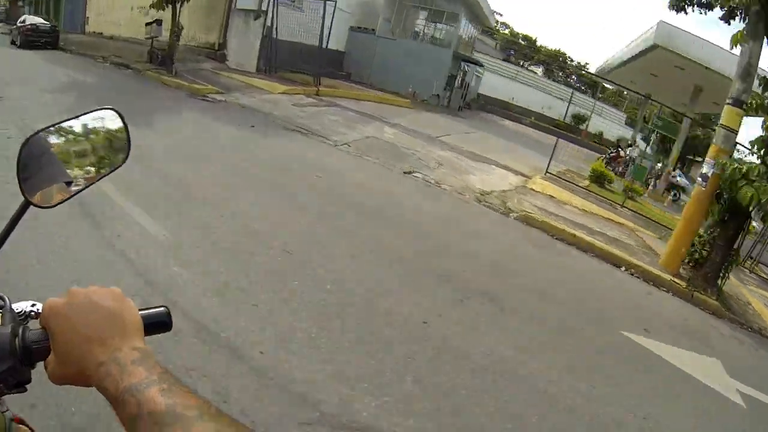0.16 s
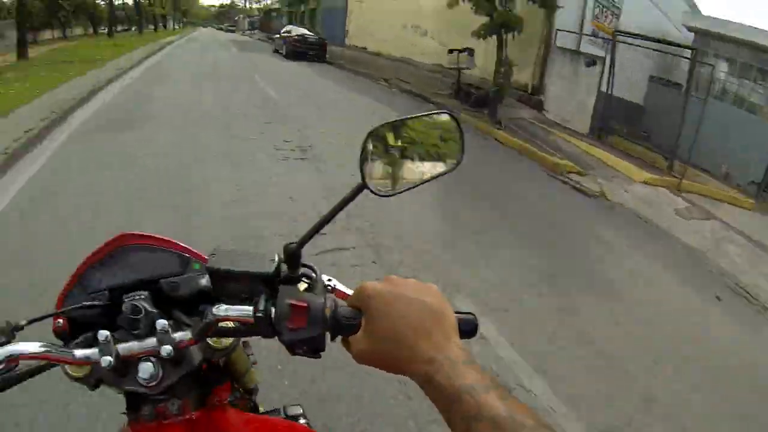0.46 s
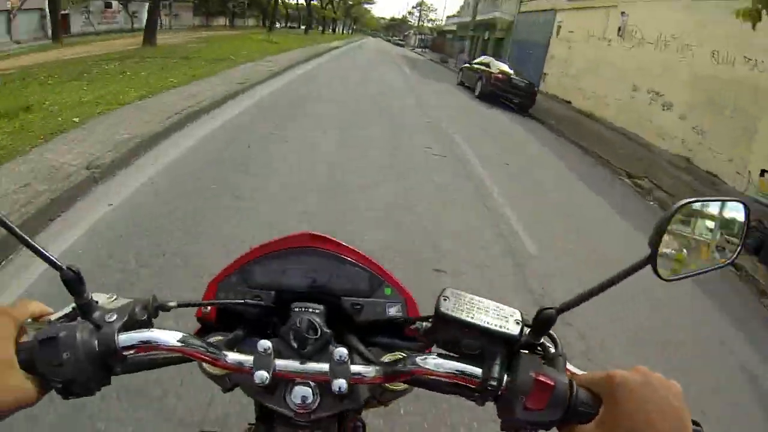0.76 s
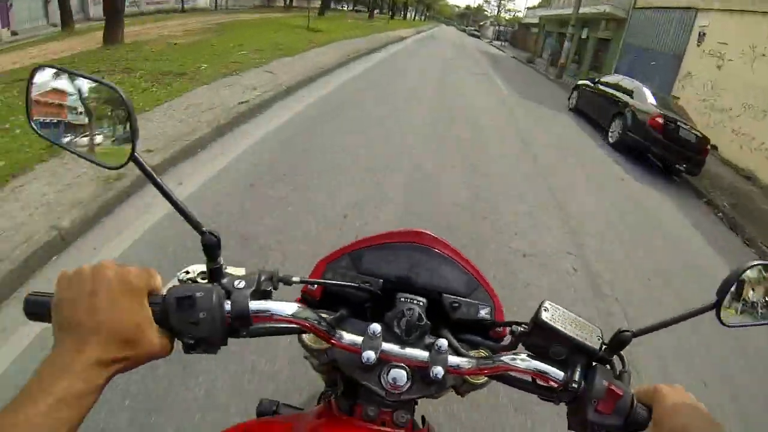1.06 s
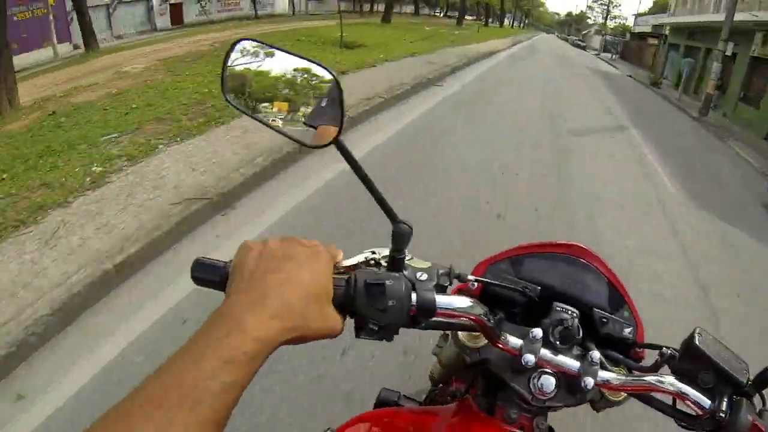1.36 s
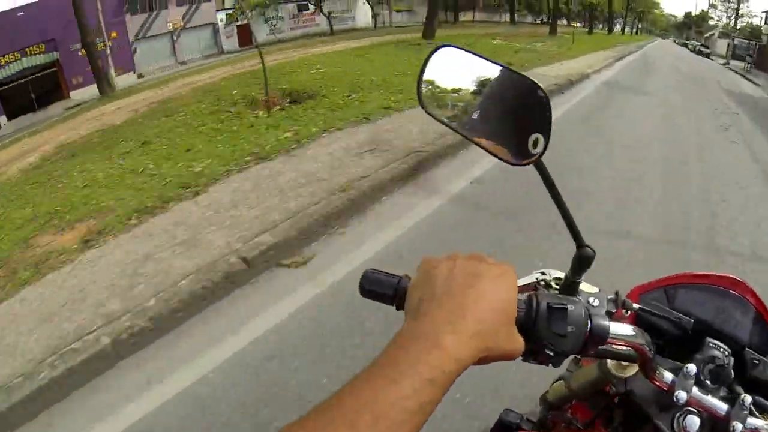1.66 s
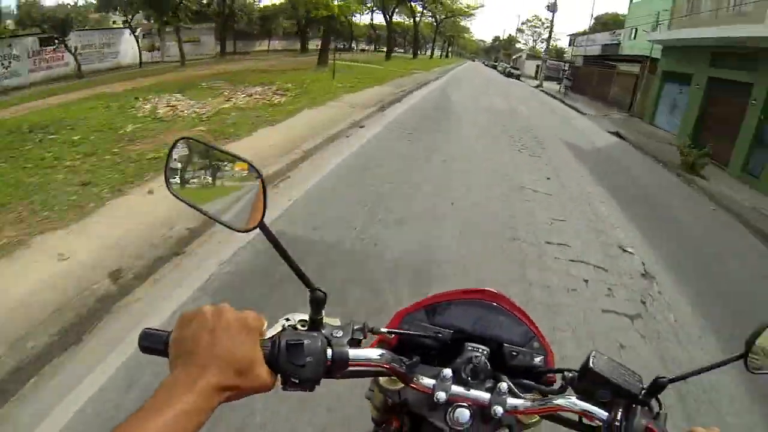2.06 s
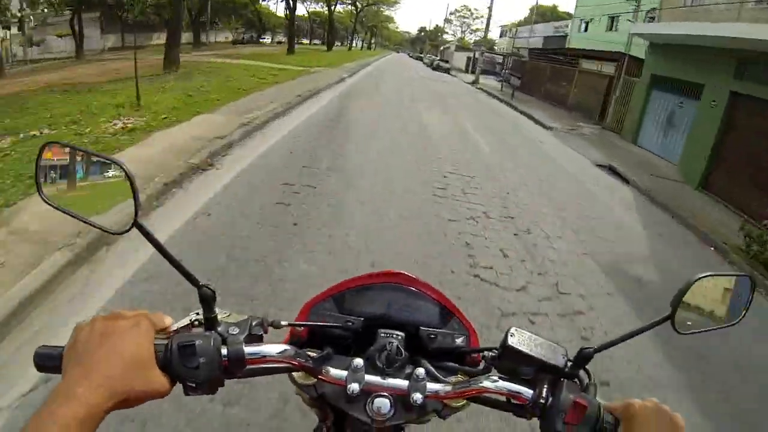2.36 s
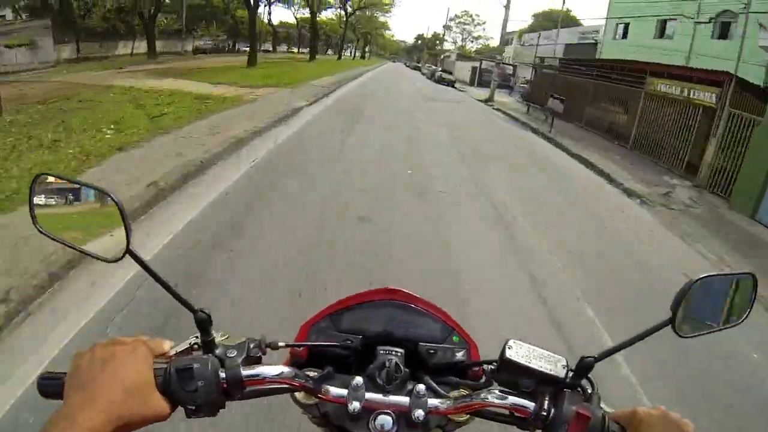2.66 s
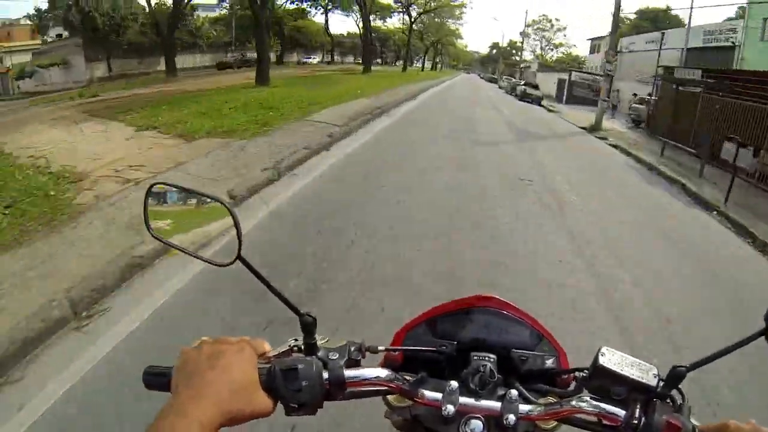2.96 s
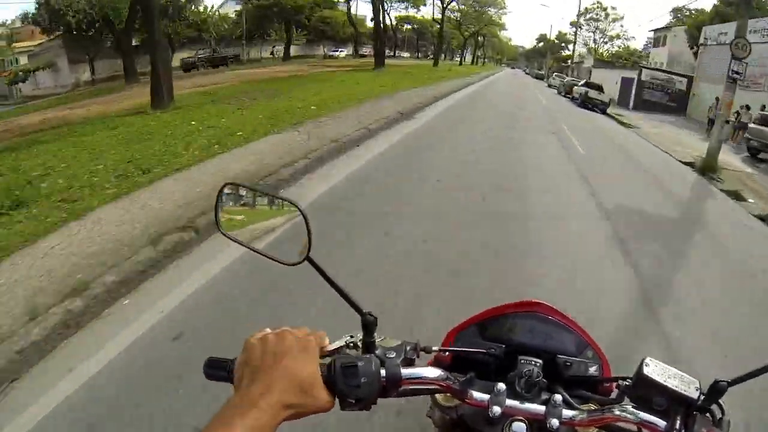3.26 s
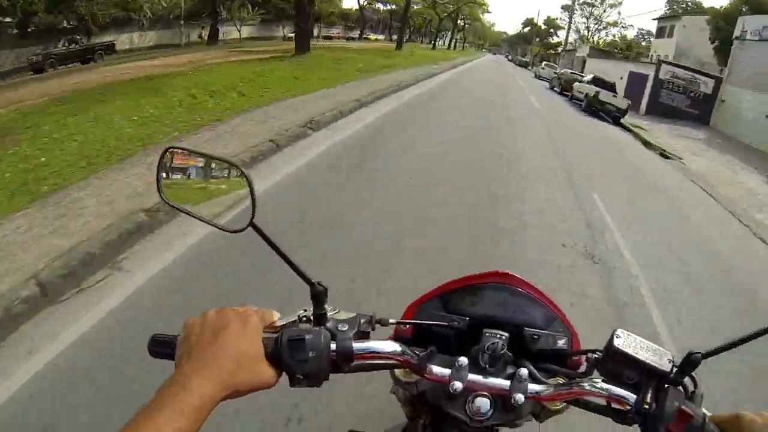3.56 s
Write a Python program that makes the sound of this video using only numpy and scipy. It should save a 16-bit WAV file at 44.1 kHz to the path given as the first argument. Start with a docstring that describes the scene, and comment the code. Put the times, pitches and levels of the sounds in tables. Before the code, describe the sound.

From the rider's seat on an open street, a loud motorcycle engine climbs, stutters and drops at each of three upshifts, snaps back with a thump, then pulls again lower, with wind on the microphone.

```python
"""A four-cylinder motorcycle pulls up through three gear changes, heard from the rider's seat.
Firing tones and pulses ringing the pipe rise with speed; each throttle closure makes them uneven as revs drop.
A narrow rush builds until the throttle opens with hard bangs, then the revs flare as the clutch bites.
Wind rumbles on the microphone throughout, under fizz, rattles and a few ticks.
The left input is muffled and drifts in level against the right; each input has its own hiss and offset."""
import sys
import numpy as np
from scipy import signal
from scipy.fft import rfft, irfft, next_fast_len
from scipy.io import wavfile
from scipy.ndimage import uniform_filter1d, map_coordinates

SR = 44100
rng = np.random.default_rng(int(sys.argv[2]) if len(sys.argv) > 2 else 0)


def unload_wav(signal):
    """Save mono or channel-first audio to the path in sys.argv[1] as 16-bit WAV at rate SR, clipped to [-1, 1]."""
    wavfile.write(
        sys.argv[1],
        SR,
        np.round(np.clip(np.atleast_2d(signal).T, -1, 1) * 32767).astype(np.int16),
    )


N = 163170

# Layer levels and input balance: (time [s], tone at twice firing rate [dB], tone at firing rate [dB],
# strong-weak firing [dB], rasp [dB], clatter [dB], treble [dB], left minus right [dB])
LEVELS = [(0.03, -15, -22, -43, -36.5, -39, -63, -7), (0.2, -12, -19.5, -29, -28, -37.5, -59.5, -10),
          (0.42, -11.5, -16, -24, -26, -34, -60, -13), (0.58, -17, -18, -35.5, -34.5, -41.5, -63, -7),
          (0.8, -19.5, -17.5, -30, -30.5, -38, -64.5, -5.5), (0.94, -21, -15, -26.5, -26, -41, -63, -5.5),
          (0.985, -27, -25, -27.5, -33.5, -43.5, -69, -10),
          (1.05, -19.5, -20.5, -16.5, -30, -39, -62.5, -15),
          (1.16, -21.5, -25.5, -10.5, -34, -39, -59, -16.5),
          (1.19, -14, -17.5, -18.5, -27.5, -40.5, -63, -11.5), (1.25, -14.5, -21, -34, -25, -40.5, -59, -8),
          (1.33, -17, -31.5, -47, -38, -48.5, -68.5, -1.5), (1.45, -17, -26, -48, -32, -47.5, -64.5, -5.5),
          (1.56, -16, -27.5, -41, -31, -40.5, -58.5, -2.5),
          (1.75, -15, -23.5, -32, -31.5, -42.5, -59.5, -5), (1.9, -15.5, -22, -40, -32.5, -42.5, -64, -7),
          (1.955, -19.5, -38, -23, -31.5, -42.5, -63, -12), (2.0, -24, -33, -11, -39.5, -40.5, -60, -14.5),
          (2.04, -15.5, -24, -22, -30.5, -38.5, -59, -18),
          (2.085, -16.5, -20.5, -11, -32.5, -37.5, -60, -18),
          (2.12, -12.5, -21, -32, -29, -39.5, -58.5, -11.5), (2.16, -16.5, -25.5, -36, -34.5, -43, -63, -2),
          (2.23, -17.5, -41.5, -54, -43, -50.5, -64, -1), (2.5, -16, -31, -42.5, -37.5, -48, -68.5, -2.5),
          (2.72, -14, -24, -28.5, -37, -41.5, -62, -7.5),
          (3.04, -14, -24, -35.5, -34.5, -43.5, -63.5, -6.5),
          (3.09, -20.5, -27, -23.5, -36.5, -40.5, -63, -11.5),
          (3.15, -14.5, -20.5, -21.5, -40, -38.5, -60.5, -17),
          (3.22, -10.5, -25.5, -27, -50, -38.5, -55.5, -16.5),
          (3.26, -16.5, -28, -25, -32.5, -39.5, -59, -19), (3.285, -16, -29, -42, -37, -48, -58, -5.5),
          (3.33, -18, -30, -33, -45.5, -46.5, -67, -2.5), (3.45, -18, -31, -37, -51.5, -50, -68.5, -3),
          (3.66, -15, -29.5, -38, -40, -45.5, -65.5, -5.5)]
# Gear changes: (throttle shuts [s], throttle opens [s], rush at the end [dB])
GEAR_CHANGES = [(.972, 1.195, -61), (1.962, 2.116, -52), (3.07, 3.285, -33.5)]
# Boom of the exhaust pipe: (frequency [Hz], relative level [dB])
PIPE_BOOM = [(60, -35.5), (170, -2), (310, 7), (430, 3), (550, -18), (750, -19), (2000, -97)]


def amp(db):
    """dB to gain."""
    return 10 ** (np.asarray(db) / 20)


def unit(x):
    """Scaled to rms 1."""
    return x / np.sqrt(np.mean(x ** 2) + 1e-20)


def along(points, hz):
    """(Hz, dB) points interpolated on a log frequency axis, -120 dB outside."""
    f, v = np.transpose(points)
    return np.interp(np.log(hz + 1), np.log(f + 1), v, left=-120, right=-120)


def controls(rows):
    """One value per sample for each column after the time."""
    s, *cols = np.transpose(rows)
    return [np.interp(np.arange(N) / SR, s, c) for c in cols]


def wobble(rate_hz):
    """Smooth random curve, rate_hz knots a second."""
    knots = rng.standard_normal(int(N * rate_hz / SR) + 4)
    return map_coordinates(knots, [np.arange(N) * rate_hz / SR])


def filtered(x, response):
    """x through a complex response of frequency, zero-padded."""
    m = 2 * next_fast_len(N // 2 + 8192)
    return irfft(rfft(x, m) * response(np.fft.rfftfreq(m, 1 / SR)), m)[..., :N]


def zero_phase(points):
    """Response with the given colour, symmetric about each pulse."""
    return lambda hz: amp(along(points, hz))


def causal(points):
    """Minimum-phase response with the given colour: it rings after the pulse, by folding the cepstrum."""
    def response(hz):
        cepstrum = irfft(np.log(amp(along(points, hz))))
        half = len(cepstrum) // 2
        cepstrum[1:half] *= 2
        cepstrum[half + 1:] = 0
        return np.exp(rfft(cepstrum))
    return response


def noise(points, patchy_db):
    """Coloured noise of rms 1 with time-frequency patches of random gain."""
    z = signal.stft(rng.standard_normal(N), nperseg=512)[2]
    field = uniform_filter1d(rng.standard_normal(z.shape), size=6, axis=0)
    field = uniform_filter1d(field, size=10, axis=1)
    x = signal.istft(z * amp(patchy_db * unit(field)), nperseg=512)[1][:N]
    return unit(filtered(x, zero_phase(points)))


def pulses(at, sizes):
    """Spikes at fractional sample positions, split between neighbouring samples."""
    i = np.clip(at, 0, N - 2).astype(int)
    part = np.clip(at - i, 0, 1)
    return np.bincount(i, sizes * (1 - part), N) + np.bincount(i + 1, sizes * part, N)


def shut(start_s, end_s):
    """1 while the throttle is closed, 0 elsewhere, with short ramps of throttle travel."""
    travel_s = 0.025
    knots_s = [start_s - travel_s, start_s, end_s - travel_s, end_s]
    return np.interp(np.arange(N) / SR, knots_s, [0, 1, 1, 0])


def engine():
    """Two firing tones plus pulses ringing pipe and metal; timing and size scatter with the throttle shut."""
    # (time [s], firing rate [1/s])
    firing_rate = [(0.03, 184.5), (0.19, 198.0), (0.37, 210.0), (0.66, 229.4), (0.86, 243.0), (0.94, 249.0),
                   (0.965, 249.0), (0.99, 238.0), (1.05, 222.0), (1.09, 210.6), (1.16, 195.7),
                   (1.185, 184.0), (1.215, 202.0), (1.24, 202.0), (1.28, 192.7), (1.31, 177.8),
                   (1.36, 182.7), (1.66, 192.4), (1.82, 198.0), (1.94, 199.5), (2.02, 189.6), (2.09, 169.4),
                   (2.105, 167.0), (2.14, 192.3), (2.19, 168.3), (2.23, 164.1), (2.59, 171.2),
                   (3.05, 180.8), (3.11, 172.4), (3.22, 151.0), (3.27, 143.9), (3.32, 181.4), (3.37, 156.9),
                   (3.67, 161.8)]
    # Pulse size of each cylinder around the mean
    cylinder_sizes = [0.3, 0.072, 0.00054, 0.24]
    # Third and fourth multiples of the firing rate: (frequency [Hz], relative level [dB])
    overtone_colour = [(400, -60.5), (470, 5.5), (560, 1.5), (640, 4), (760, -1.5), (860, -22.5),
                       (1000, -49)]
    # Edge of each pulse: (frequency [Hz], relative level [dB])
    rasp_colour = [(500, -68.5), (800, 4), (1000, 14.5), (1150, 2.5), (1300, 8.5), (1500, 5), (1750, -16.5),
                   (2300, -58.5)]
    # Mechanical noise: (frequency [Hz], relative density [dB per Hz])
    clatter_colour = [(880, -39.5), (1500, -3), (1870, -4), (2020, -8), (2330, -7.5), (3700, -10.5),
                      (4350, -18.5), (5190, -23), (6750, -43.5)]
    # Exhaust noise: (frequency [Hz], relative density [dB per Hz])
    roar_colour = [(60, -13), (300, -6), (600, -4.5), (1600, -21), (3000, -56)]
    # Metal resonances: (frequency [Hz], width [Hz], relative level before squaring [dB])
    ring_modes = [(2030, 310, 3), (3002, 290, 1), (3632, 310, -2.5)]
    # Blurred gear whine: (multiple of firing rate, level against clatter [dB])
    whine_orders = [(12, -14), (17, -15)]
    tone_scatter_db = 0.7
    jitter_firings, shut_jitter_firings = 0.002, 0.09
    stumble, rasp_alt, rasp_scatter, shut_scatter = 0.2, 0.4, 0.2, 0.6  # parts of a pulse
    overtone_db, roar_db = -12, -15.5  # against the tone at twice the firing rate
    uneven_db, shut_uneven_db = -20, 11  # same reference; second adds when shut
    ring_db = -6  # against the clatter
    gate_depth, gate_sharp = 0.25, 0.95

    second_db, first_db, alt_db, rasp_db, clatter_db, _, _ = controls(LEVELS)
    turns = np.cumsum(controls(firing_rate)[0]) / SR  # in firings
    closed = sum(shut(a, b) for a, b, _ in GEAR_CHANGES)
    k = np.arange(1, int(turns[-1]))
    draw = rng.standard_normal((len(k), 4))
    off = np.interp(k, turns, closed)
    jitter = (jitter_firings + shut_jitter_firings * off) * draw[:, 0]
    at = np.interp(k + jitter, turns, np.arange(N))
    even_at = np.interp(k, turns, np.arange(N))
    sign = (-1.) ** k
    size = -1 - np.array(cylinder_sizes)[k % 4]

    def tone(order):
        return -np.sqrt(2) * np.cos(2 * np.pi * order * turns)

    def metal(hz):
        modes = sum(amp(db) * 1j * hz * w / (c * c - hz * hz + 1j * hz * w) for c, w, db in ring_modes)
        return modes ** 2

    tones = amp(first_db + tone_scatter_db * wobble(25)) * tone(order=1)
    tones = tones + amp(second_db + tone_scatter_db * wobble(25)) * tone(order=2)
    tones = tones * amp(1.5 * closed * np.minimum(wobble(70), 1))  # misfires break the tones up
    overtones = unit(filtered(pulses(at, size), zero_phase(overtone_colour)))
    uneven = unit(filtered(pulses(at, draw[:, 1]), causal(PIPE_BOOM)))
    alternate = pulses(even_at, sign + stumble * draw[:, 2])
    alternate = unit(filtered(alternate, zero_phase(PIPE_BOOM)))
    edge = size - rasp_alt * sign - (rasp_scatter + shut_scatter * off) * draw[:, 3]
    rasp = unit(filtered(pulses(at, edge), causal(rasp_colour)))
    strike = size - rasp_alt * sign - shut_scatter * off * draw[:, 3]
    ring = unit(filtered(pulses(at, strike), metal))
    whine = (1 - closed) * sum(amp(db) * wobble(220) * tone(order) for order, db in whine_orders)
    # clatter bunches once per firing
    gate = unit(1 - gate_depth + gate_depth * np.exp(gate_sharp * np.cos(2 * np.pi * turns)))
    clatter = gate * noise(clatter_colour, patchy_db=1.5) + amp(ring_db + wobble(4)) * ring + whine
    body = amp(overtone_db) * overtones + amp(uneven_db + shut_uneven_db * closed) * uneven
    body = body + amp(roar_db) * noise(roar_colour, patchy_db=1.5)
    return (tones + amp(second_db) * body + amp(alt_db) * alternate
            + amp(rasp_db) * rasp + amp(clatter_db) * clatter)


def bangs(even):
    """Hard single firings in the pipe replace the low part of the even ones as the throttle opens."""
    # (time [s], peak of each firing alone [dB])
    firings = [(1.198, -5), (2.109, -7), (2.116, -1), (3.276, -1.5), (3.284, -3.5)]
    fade_s, low_hz = 0.008, 700
    s, db = np.transpose(firings)
    boom = zero_phase(PIPE_BOOM)
    away_s = np.abs(np.arange(N)[:, None] / SR - s).min(axis=1)
    single = filtered(pulses(np.array([SR]), np.ones(1)), boom)
    hard = filtered(pulses(s * SR, amp(db)), boom) / single.max()
    low = filtered(even, lambda hz: hz < low_hz)
    return even - low * np.clip(1 - away_s / fade_s, 0, 1) - hard


def treble():
    """Thin noise fizz with scattered decaying noise rattles; a narrow rush builds while the throttle is shut."""
    # Fizz and rattle: (frequency [Hz], relative density [dB per Hz])
    fizz_colour = [(3500, -42), (5000, 0), (6500, -5.5), (9500, -8.5), (12600, -17.5)]
    # Rush: (frequency [Hz], relative density [dB per Hz])
    rush_colour = [(1500, -30), (1950, -11), (2080, 0), (2250, -11), (3100, -14), (3800, -30)]
    rattles_per_s, rattle_spread_db, rattle_t60_s = 45, 2.5, 0.008
    rattle_db = -6  # against the fizz
    draw = rng.random((int(N / SR * rattles_per_s), 2))
    ticks = pulses(draw[:, 0] * N, amp(-rattle_spread_db * np.log(draw[:, 1] + 1e-3)))
    decay = amp(-60 * np.arange(400) / SR / rattle_t60_s)
    burst = signal.fftconvolve(ticks, decay)[:N] * rng.standard_normal(N)
    rattle = unit(filtered(burst, zero_phase(fizz_colour)))
    fizz = amp(controls(LEVELS)[-2]) * (noise(fizz_colour, patchy_db=3.0) + amp(rattle_db) * rattle)
    t = np.arange(N) / SR
    build = sum(amp(db) * shut(a, b) * np.clip((t - a) / (b - a), 0, 1) for a, b, db in GEAR_CHANGES)
    return fizz + build * noise(rush_colour, patchy_db=-0.5)


def clicks():
    """Short dry ticks, mostly as a gear engages: decaying random-sign bursts, high-passed."""
    # (time [s], peak before the high-pass [dB])
    ticks = [(0.782, -39), (1.1966, -41), (2.1143, -40.5), (3.2804, -38)]
    t60_s, highpass_hz = 0.006, 2500
    out, t = np.zeros(N), np.arange(1024) / SR
    for s, db in ticks:
        out[round(s * SR):][:len(t)] += amp(db - 60 * t / t60_s) * rng.choice([-1, 1], len(t))
    return filtered(out, lambda hz: 1j * hz / (highpass_hz + 1j * hz))


def wind():
    """Lumpy low noise rumble; cancels the balance drift on the left, so swells on the right when it leads."""
    # (time [s], left rumble before muffling and swing [dB])
    rumble_level = [(0.1, -48.5), (3.65, -42)]
    # (frequency [Hz], relative density [dB per Hz])
    rumble_colour = [(12, -30), (20, -10), (32, -16.5), (65, -10), (130, -12), (170, -29)]
    swing_db = 4.5
    level_db = controls(rumble_level)[0] - controls(LEVELS)[-1]
    return amp(level_db + swing_db * wobble(9.7)) * noise(rumble_colour, patchy_db=0.5)


def scene():
    """Everything reaches both inputs alike."""
    x = bangs(engine()) + treble() + clicks() + wind()
    return np.array([x, x])


def record(dry):
    """Left tilted to the bass and drifting in level; hiss, band limit, then a constant offset on each input."""
    # (frequency [Hz], relative density [dB per Hz])
    hiss_colour = [(300, -2), (3000, 1), (12500, -7.5)]
    # Rows left, right: (rms level [dB])
    hiss_level_db = [
        [-64.5],
        [-74],
    ]
    # Rows left, right: (constant offset [full scale])
    input_offset = [
        [.192],
        [.009],
    ]
    muffle_hz, muffle_end_hz, muffle_db = 39.5, 1140, 18.5  # left falls between these, from this gain
    top_hz = 15000

    def muffle(hz):
        return amp(muffle_db) * (1 + 1j * hz / muffle_end_hz) / (1 + 1j * hz / muffle_hz)

    left = filtered(dry[0] * amp(controls(LEVELS)[-1]), muffle)
    hiss = np.array([noise(hiss_colour, patchy_db=0.8), noise(hiss_colour, patchy_db=0.8)])
    inputs = np.array([left, dry[1]]) + amp(hiss_level_db) * hiss
    return filtered(inputs, lambda hz: hz < top_hz) + np.array(input_offset)


dry = scene()
out = record(dry)
unload_wav(out)
```